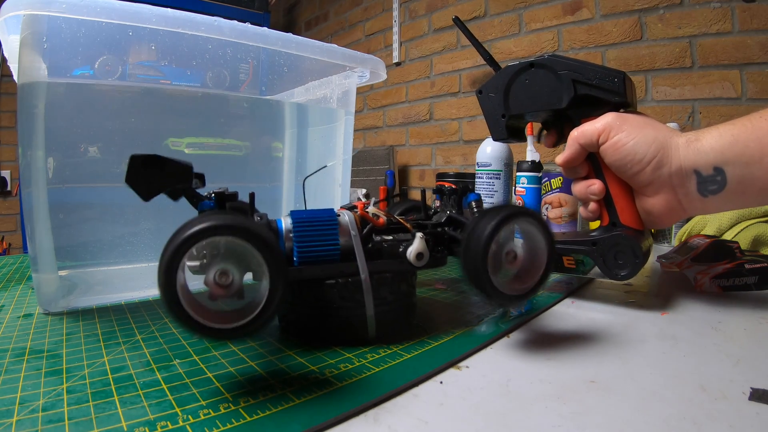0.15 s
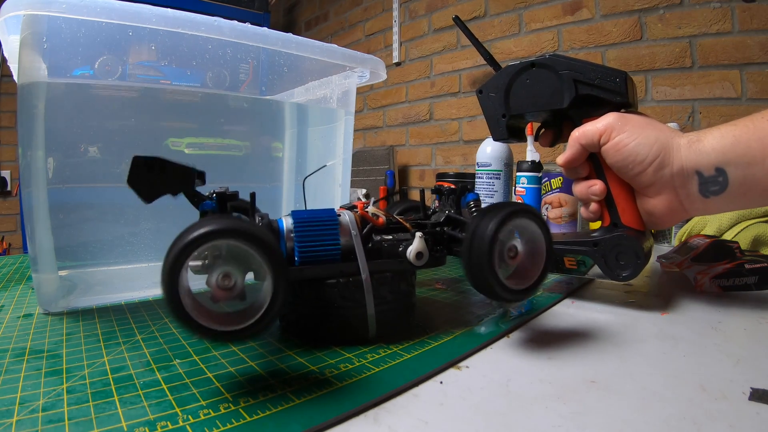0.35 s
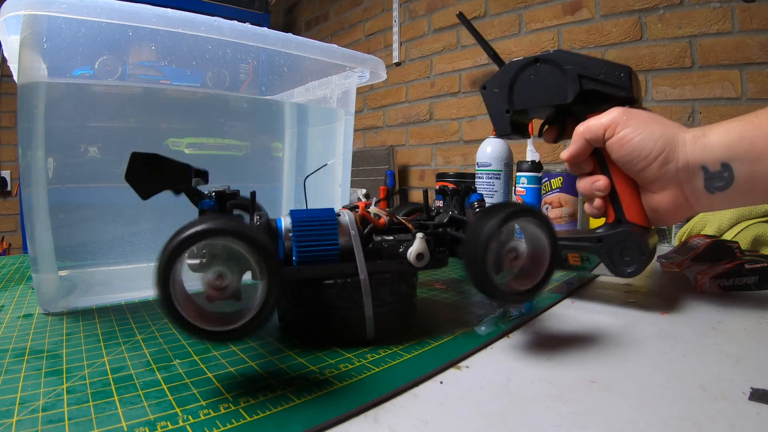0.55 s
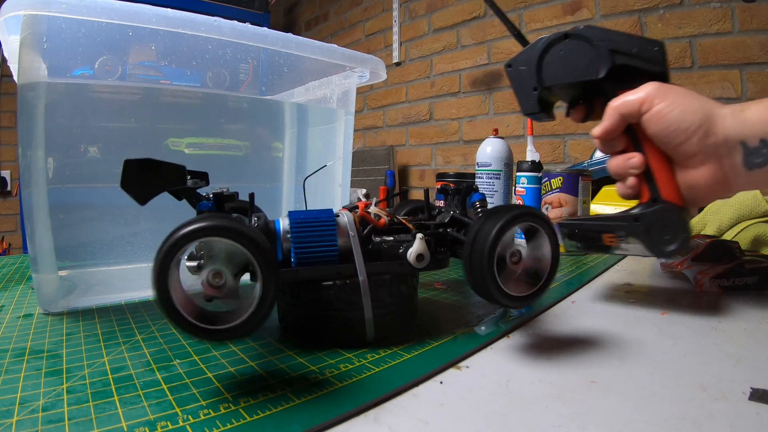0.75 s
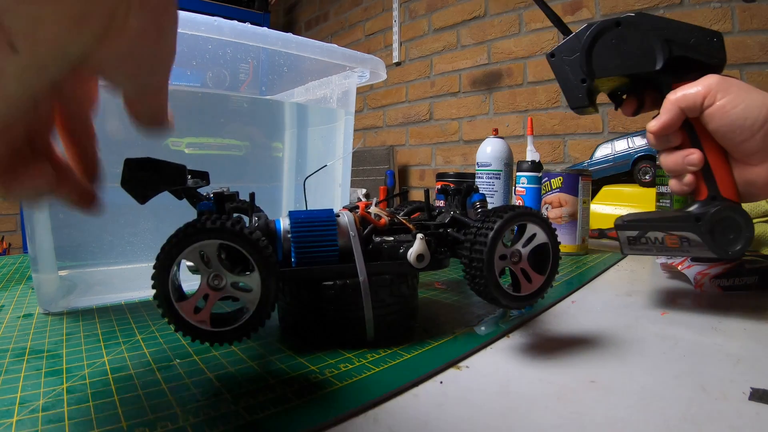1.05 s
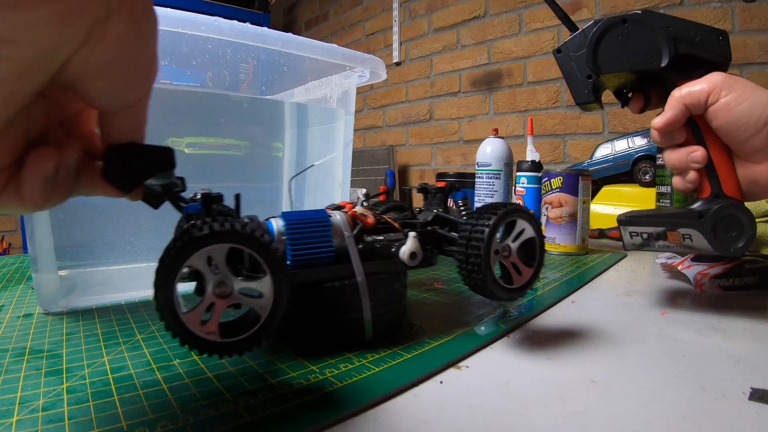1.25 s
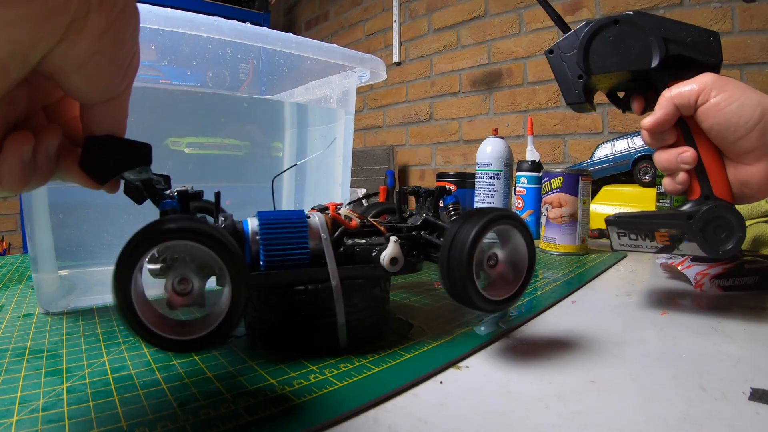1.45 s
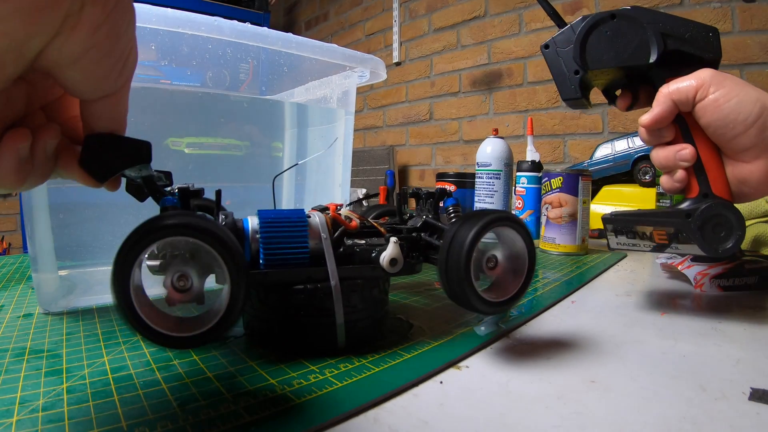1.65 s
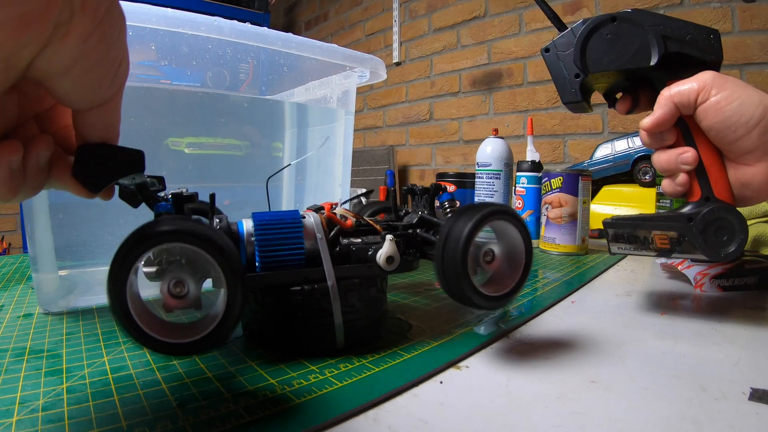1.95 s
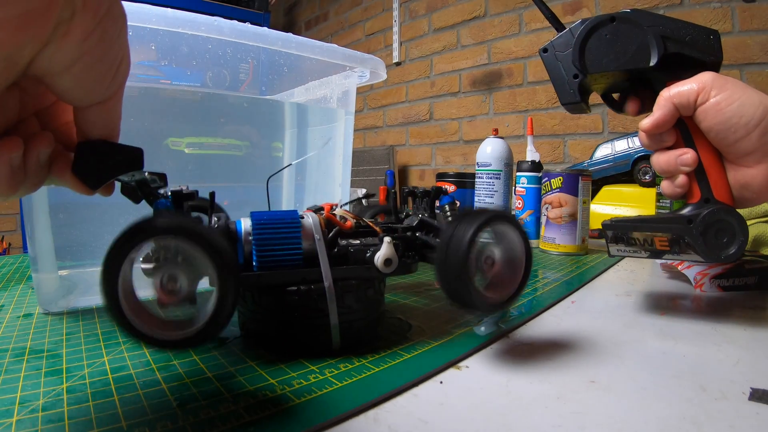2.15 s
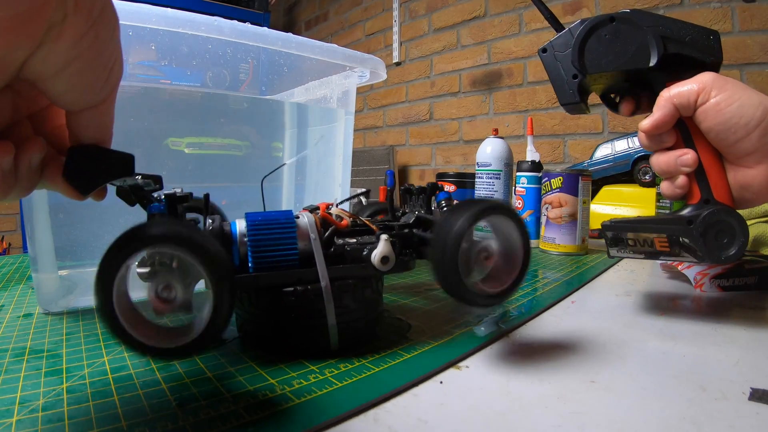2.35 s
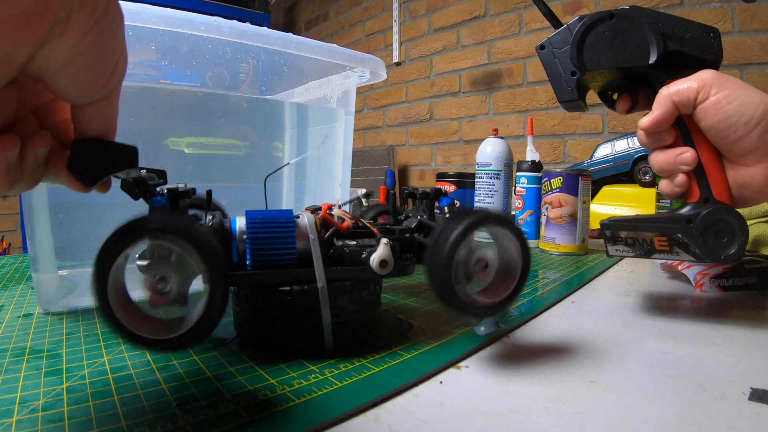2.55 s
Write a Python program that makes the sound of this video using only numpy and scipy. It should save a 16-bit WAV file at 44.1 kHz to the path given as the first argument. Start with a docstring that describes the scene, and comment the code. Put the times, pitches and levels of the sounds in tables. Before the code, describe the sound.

Close stereo pickup indoors: dense, bright plastic drivetrain rattle coasts down into clacks and soft ticks, a quiet gap, a brief electronic tone, then four quick throttle bursts of buzzing, climbing whine.

```python
"""A hard plastic rattle comes first: an electric model car, propped up indoors, coasts down with its wheels
in the air. Loose knocks and a few ticks follow, then a brief electronic tone and four throttle revs.
Clicks and hiss through chassis resonances make the rattle; speed-driven tooth tones make the gear whine.
A low hum, tyre draught, a creak and room tone lie beneath, all reaching two microphone ports."""
import sys
import numpy as np
from scipy import signal
from scipy.fft import rfft, irfft
from scipy.io import wavfile
from scipy.ndimage import uniform_filter1d

SR = 44100
rng = np.random.default_rng(int(sys.argv[2]) if len(sys.argv) > 2 else 0)


def int16_out(signal):
    """Quantize to a 16-bit WAV file."""
    q = np.round(np.clip(np.atleast_2d(signal).T, -1, 1) * 32767)
    wavfile.write(sys.argv[1], SR, q.astype(np.int16))


N = 119070
T = np.arange(N) / SR  # s
HZ = np.fft.rfftfreq(N, 1 / SR)

# Quiet indoor air: relative spectrum (frequency [Hz], density [dB per Hz])
ROOM_SPECTRUM = [(80, -40), (160, -3), (320, -14), (1300, -13), (15000, -40)]
# Stirring of that air (time [s], level change [dB])
AIR_STIR = [(.85, 4), (1, -13), (1.03, 4.5), (1.13, -7.5), (1.25, 3)]
# Low creak of the stand (start [s], end [s], pitch [Hz], peak level [dB])
STAND_CREAK = (1.02, 1.085, 250, -58)
# Low end before panning and gusts (time [s], hum level [dB], tyre draught level [dB])
LOW_LEVELS = [(0, -44, -46.5), (.52, -83, -30.5), (.7, -37, -39.5), (.85, -45.5, -65.5), (1.3, -50, -65.5),
              (1.45, -70, -66), (1.72, -63.5, -63), (1.9, -50, -48), (2.7, -49.5, -47)]
# Tyre draught: relative spectrum (frequency [Hz], density [dB per Hz])
DRAUGHT_SPECTRUM = [(25, 1), (50, 5.5), (105, -3.5), (145, 3.5), (380, -24.5), (700, -44)]
# Speed controller tone: one entry for each multiple of the switching rate, from the first (level [dB])
SWITCH_HARMONICS = [-47, -46, -54, -52, -58]
# Single ticks as the wheels settle (time [s], ring peak [dB], pitch [Hz], crack over ring [dB])
SETTLING_TICKS = [(0.899, -36, 1340, 2.5), (1.001, -36.5, 1000, -10), (1.106, -40, 930, -4),
                  (1.185, -43.5, 1340, -19), (1.244, -45.5, 800, -20), (1.351, -45, 1090, -2.5)]
# Drivetrain rattle before chatter and clumps (time [s], level [dB])
RATTLE_LEVEL = [(0, -24), (.2, -27.5), (.56, -32.5), (.7, -39), (.86, -50.5), (.94, -62), (1.36, -78),
                (1.41, -40.5), (1.45, -28), (1.7, -32), (1.74, -30.5), (1.87, -26), (1.91, -29.5),
                (2.185, -29.5), (2.21, -28.5), (2.27, -26.5), (2.58, -30), (2.66, -30.5), (2.7, -26.5)]
# Clumps of knocks from play in the drivetrain, as it slows and as it starts again
# (time [s], nominal peak [dB])
KNOCK_CLUMPS = [(0.56, -18.5), (0.713, -16), (0.7527, -15), (0.789, -25.5), (0.8207, -20), (1.2866, -31.5),
                (1.4, -18)]
# Plastic chassis: relative response (frequency [Hz], gain [dB per Hz])
CHASSIS_RESPONSE = [(180, -52), (300, -21), (507, -17.5), (618, -11.5), (1310, -3), (2190, -6.5),
                    (3190, -3.5), (5670, -6), (9740, -10.5), (15200, -43.5)]
# Gear case resonances (frequency [Hz], width [Hz], peak gain [dB])
GEAR_CASE = [(1250, 350, 13), (2720, 250, 9), (3480, 400, 14), (4600, 700, 11), (6050, 600, 11)]
# Pinion mesh under throttle, one list a rev (time [s], mesh frequency [Hz], effort before the case [dB])
PINION_REVS = [
    [(1.434, 737, -47), (1.462, 1290, -36), (1.474, 1600, -45), (1.49, 1983, -42), (1.512, 2267, -38),
     (1.545, 2385, -39)],
    [(1.705, 1358, -44), (1.723, 1383, -46), (1.753, 1690, -42), (1.783, 2999, -35), (1.799, 3540, -39),
     (1.839, 4716, -43), (1.885, 5300, -46)],
    [(2.17, 3520, -42), (2.189, 3370, -33), (2.198, 3628, -50), (2.22, 4180, -40), (2.25, 4800, -40),
     (2.32, 5540, -42)],
    [(2.595, 2648, -44), (2.619, 2778, -39), (2.652, 3610, -32), (2.661, 3806, -43), (2.7, 4500, -46)],
]
# Second gear stage, one list a passage (time [s], mesh frequency [Hz], effort before the case [dB])
SECOND_STAGE = [
    [(0, 2700, -41), (.14, 2780, -41)],
    [(1.81, 2680, -52), (1.862, 3400, -38), (1.89, 3370, -42)],
    [(1.91, 2050, -44), (2.14, 1361, -47), (2.19, 1200, -44)],
    [(2.24, 3120, -39), (2.32, 3620, -40)],
]
# Pinion mesh multiples 2, 3 and 4 (level over the fundamental before the case [dB])
MESH_OVERTONES = [0, -1, 0]
# Phase between the ports (frequency [Hz], lead of the left [rad])
PORT_PHASES = [(350, -0.68), (860, 0.81), (7000, 0.086), (9500, -2)]
# Level between the ports (frequency [Hz], left minus right [dB])
PORT_LEVELS = [(400, -0.5), (1800, 3), (8000, -1.5)]
# Diffuse room sound (frequency [Hz], room over direct [dB])
ROOM_SHARE = [(600, -4), (3000, -11.5), (6000, 0.5)]

ROOM_TONE_DB = -61  # before the air stirs
HUM_HZ, HUM_WAVER, HUM_OCTAVE_DB = 39, .03, -22  # waver: rms share of pitch
GUST_DB = 4  # rms
SWITCH_HZ, SWITCH_ON_S, SWITCH_OFF_S = 1998, 1.372, 1.45
TICK_T60_S, CRACK_T60_S = 0.017, .015
CLICKS_PER_S, CLICK_SPREAD_DB, HISS_DB = 5000, 3., -1  # hiss level is over the clicks
CHATTER_DB, PATCHY_DB = 1, 3  # rms
DULL_HZ, DULL_SHARE = 5600, 0.75  # extra treble loss, in dB per dB that the rattle falls
CLUMP_S = 0.015
RATTLE_RING = 0.38  # share of the gear case gain, in dB, that the rattle gets
TEETH, SHAFT_DB, SHAFT_HEARD_HZ = 6, -44, 640  # the shaft turns at mesh Hz / TEETH, radiates above the last
OVERTONE_ROLL_HZ = 6800
MESH_WOBBLE, STAGE_WOBBLE = .008, .012  # rms share of pitch; the stage's holds at WOBBLE_HZ
WOBBLE_HZ, MESH_FLUTTER_DB = 1600, 3.  # flutter is rms
ROOM_T60_S, SHIFT_PER_S = 0.047, 3
EDGE_HZ = 15200


def amp(db):
    """Amplitude from dB."""
    return 10 ** (np.asarray(db) / 20)


def evened(x):
    """Scale to rms 1."""
    return x / np.sqrt(np.mean(x ** 2) + 1e-20)


def curve(points, t):
    """Straight lines through (time, value) points."""
    return np.interp(t, *np.transpose(points))


def read(points, hz):
    """Straight lines through (frequency, value) points on a log frequency axis."""
    f, value = np.transpose(points)
    return np.interp(np.log(hz + 1), np.log(f + 1), value)


def peaks(hz, rows):
    """Gain of a set of resonances standing over a flat response."""
    return np.sqrt(1 + sum(amp(db) ** 2 / (1 + (2 * (hz - f) / w) ** 2) for f, w, db in rows))


def colour(x, gain):
    """Causal, minimum-phase filter with the given gain over HZ."""
    cepstrum = irfft(np.log(np.maximum(gain, 1e-5)), N)
    cepstrum[1:N // 2] *= 2
    cepstrum[N // 2 + 1:] = 0
    response = irfft(np.exp(rfft(cepstrum)), N)[:4096]
    return signal.oaconvolve(x, response)[:N]


def chance(rate_hz):
    """Random curve of rms 1, drawn through 2 * rate_hz points a second."""
    steps = rng.standard_normal(N // 50)
    return evened(np.interp(T * 2 * rate_hz, np.arange(len(steps)), steps))


def room_tone():
    """Quiet indoor air: shaped noise, partly shared by the channels, whose level stirs."""
    a, b = rng.standard_normal((2, N))
    pair = irfft(rfft([a, 0.5 * a + 0.87 * b]) * amp(read(ROOM_SPECTRUM, HZ)), N)
    return amp(ROOM_TONE_DB + curve(AIR_STIR, T)) * evened(pair)


def creak():
    """The stand gives a short low tone that swells and fades."""
    start, end, hz, db = STAND_CREAK
    progress = np.clip((T - start) / (end - start), 0, 1)
    swell = np.sin(np.pi * progress) ** .5
    return amp(db) * swell * np.sin(2 * np.pi * hz * T)


def low_end():
    """A wavering hum with its octave, stronger on the right, and lumpy low noise as air from the tyres."""
    s, hum_db, air_db = np.transpose(LOW_LEVELS)
    turn = 2 * np.pi * np.cumsum(HUM_HZ * (1 + HUM_WAVER * chance(1.307))) / SR
    hum = np.sin(turn) + amp(HUM_OCTAVE_DB) * np.sin(2 * turn)
    hum = np.sqrt(2) * amp(np.interp(T, s, hum_db)) * hum
    a, b = irfft(rfft(rng.standard_normal((2, N))) * amp(read(DRAUGHT_SPECTRUM, HZ)), N)
    air = evened(np.array([a + 0.18 * b, a - 0.066 * b]))
    gusts = amp(np.interp(T, s, air_db) + GUST_DB * chance(15))
    return hum * np.array([[.4], [1.6]]) + air * gusts


def controller():
    """The motor sings at the speed controller's switching rate and its multiples as the first rev begins."""
    fade_in = np.clip((T - SWITCH_ON_S) / .003, 0, 1)
    fade_out = np.clip((SWITCH_OFF_S - T) / .03, 0, 1)
    tone = sum(amp(db) * np.sin(2 * np.pi * k * SWITCH_HZ * T) for k, db in enumerate(SWITCH_HARMONICS, 1))
    return fade_in * fade_out * tone


def ticks(body):
    """Each tick is a short plastic ring with a noise crack through the chassis response."""
    ring, crack, t = np.zeros(N), np.zeros(N), T[:3000]
    for at, db, hz, treble_db in SETTLING_TICKS:
        i = round(at * SR)
        ring[i:i + len(t)] += amp(db - 60 * t / TICK_T60_S) * np.sin(2 * np.pi * hz * t)
        crack[i:i + len(t)] += amp(db + treble_db - 60 * t / CRACK_T60_S) * rng.standard_normal(len(t))
    # thin the crack below 2200 Hz and dull its top
    band = 1 / np.sqrt(1 + (2200 / (HZ + 1)) ** 6 + (HZ / DULL_HZ) ** 4)
    return ring + colour(crack, body * band)


def rattle():
    """Dense tooth clicks and sliding hiss ring the chassis in drifting patches; knock clumps ring the same."""
    spread = amp(CLICK_SPREAD_DB * np.minimum(rng.exponential(1, N), 3))
    struck = rng.random(N) < CLICKS_PER_S / SR
    clicks = evened(rng.standard_normal(N) * spread * struck)
    drive = evened(clicks + amp(HISS_DB) * rng.standard_normal(N))

    hz, t, z = signal.stft(drive, SR, nperseg=512, noverlap=384)
    patches = uniform_filter1d(rng.standard_normal(z.shape), size=2, axis=0)
    patches = evened(uniform_filter1d(patches, size=9, axis=1))
    # treble falls faster than the level once the rattle drops below -28 dB
    slack_db = np.clip(curve(RATTLE_LEVEL, t) + 28, -25, 0)
    treble = 1 / (1 + (DULL_HZ / (hz[:, None] + 1)) ** 4)
    z = z * amp(PATCHY_DB * patches + DULL_SHARE * slack_db * treble)
    drive = evened(signal.istft(z, SR, nperseg=512, noverlap=384)[1][:N])

    level = amp(curve(RATTLE_LEVEL, T) + CHATTER_DB * chance(45))
    for at, db in KNOCK_CLUMPS:
        u = np.maximum(T - at, 0) / CLUMP_S
        # 19 dB allows for noise peaks over the rms level
        level = level + amp(db - 19) * np.exp(-u ** 2) * np.minimum(u * 8, 1)
    body = evened(amp(read(CHASSIS_RESPONSE, HZ)) * peaks(HZ, GEAR_CASE) ** RATTLE_RING)
    return colour(drive * level, body), body


def gear(rows, pinion):
    """A wobbling tooth tone on a speed curve, swelling where it crosses a resonance of the gear case."""
    s, hz, effort_db = np.transpose(rows)
    t = T[(T >= s[0]) & (T < s[-1])]
    f = np.interp(t, s, hz)
    # the second stage roughens with speed
    wobble = MESH_WOBBLE if pinion else STAGE_WOBBLE * f / WOBBLE_HZ
    turn = 2 * np.pi * np.cumsum(f * (1 + wobble * chance(146.3)[:len(t)])) / SR
    # only the pinion adds a shaft tone and overtones
    shaft_gain = pinion / (1 + (SHAFT_HEARD_HZ * TEETH / f) ** 10)
    tone = amp(SHAFT_DB) * np.sin(turn / TEETH) * shaft_gain
    multiples_db = [0] + list(MESH_OVERTONES) * pinion
    for k, db in enumerate(multiples_db, 1):
        gain = peaks(k * f, GEAR_CASE) / (1 + (k * f / OVERTONE_ROLL_HZ) ** 8)
        flutter_db = MESH_FLUTTER_DB * chance(55)[:len(t)]
        tone = tone + gain * amp(np.interp(t, s, effort_db) + db + flutter_db) * np.sin(k * turn)
    out = np.zeros(N)
    start = np.searchsorted(T, t[0])
    out[start:start + len(t)] = np.sqrt(2) * tone * signal.windows.tukey(len(t), 400 / len(t))
    return out


def ports(x):
    """Direct sound differs in phase and level between ports; each hears its own slowly shifting room tail."""
    t, side, room = T[:6000], np.array([[.5], [-.5]]), 0
    wet = amp(read(ROOM_SHARE, HZ))
    balance = amp(side * read(PORT_LEVELS, HZ)) / np.sqrt(1 + wet ** 2)
    # three tails take turns at constant total power
    for k in range(3):
        tails = rng.standard_normal((2, len(t))) * amp(-60 * t / ROOM_T60_S) * (t > .002)
        tails /= np.linalg.norm(tails, axis=1, keepdims=True)
        share = np.sqrt(2 / 3) * np.cos(np.pi * (SHIFT_PER_S * T + k / 3))
        room = room + wet * rfft(tails, N) * rfft(x * share)
    direct = rfft(x) * np.exp(1j * side * read(PORT_PHASES, HZ))
    return irfft(balance * (room + direct), N)


def scene():
    """Send the car through the ports, over the creak, low end and room tone."""
    chatter, body = rattle()
    gears = sum(gear(rows, True) for rows in PINION_REVS)
    gears = gears + sum(gear(rows, False) for rows in SECOND_STAGE)
    car = chatter + ticks(body) + controller() + gears
    return ports(car) + creak() + low_end() + room_tone()


def record(dry):
    """Cut everything above the band edge with a steep linear-phase low-pass."""
    low_pass = signal.firwin(511, EDGE_HZ, window=("kaiser", 9), fs=SR)
    return signal.oaconvolve(dry, low_pass[None], "same")


dry = scene()
out = record(dry)
int16_out(out)
```